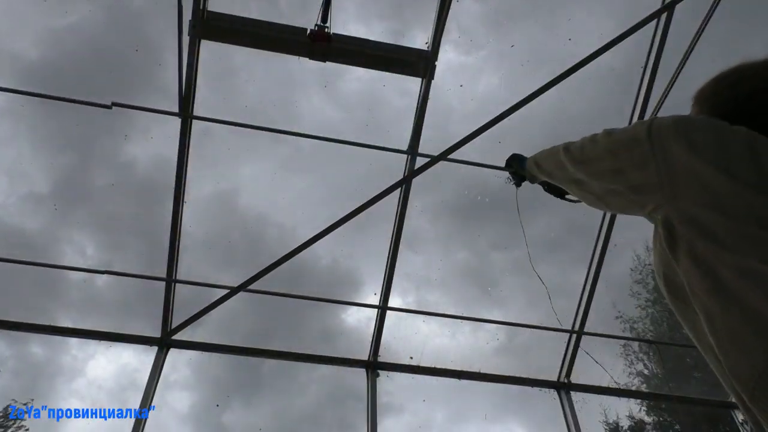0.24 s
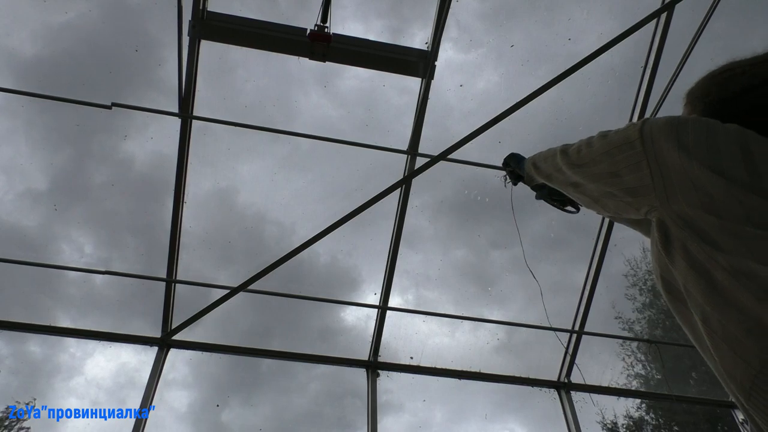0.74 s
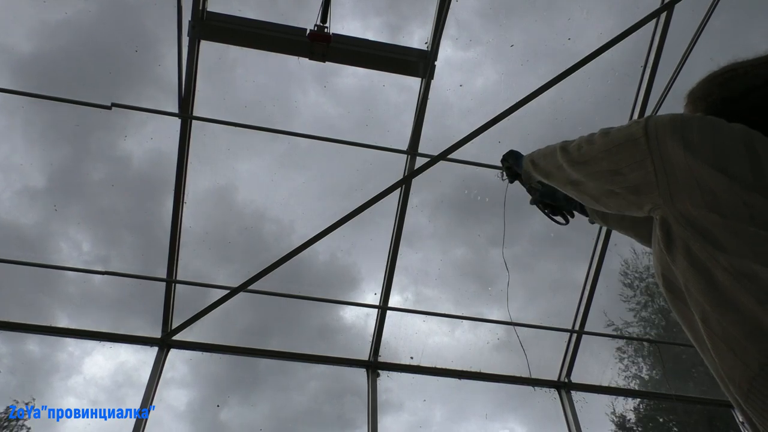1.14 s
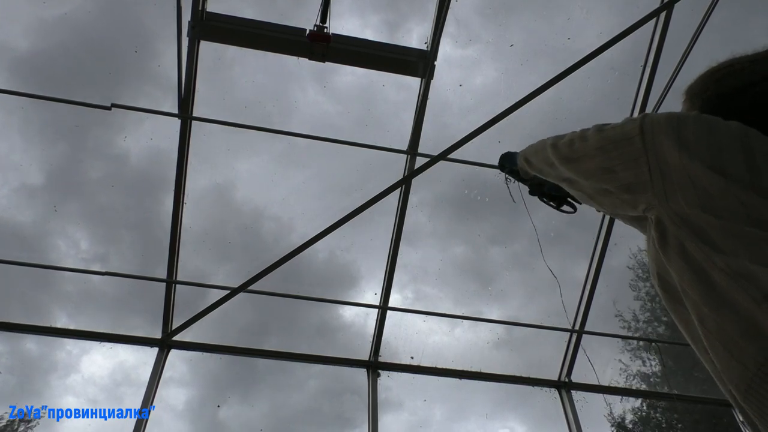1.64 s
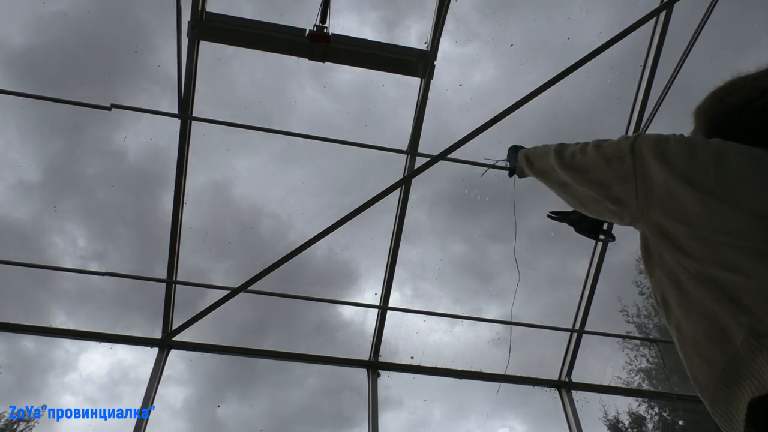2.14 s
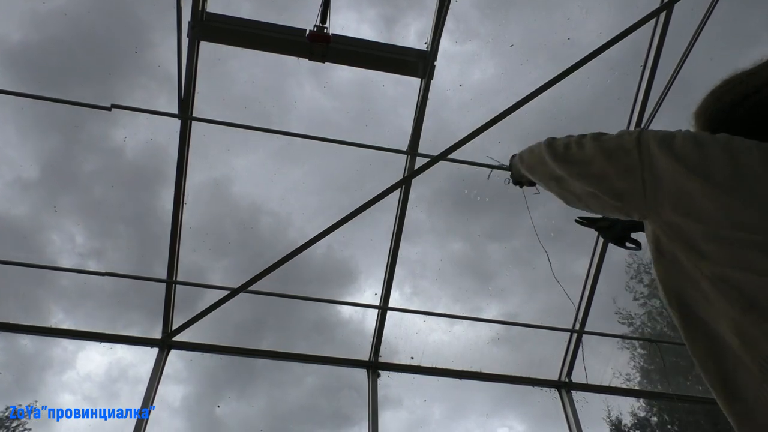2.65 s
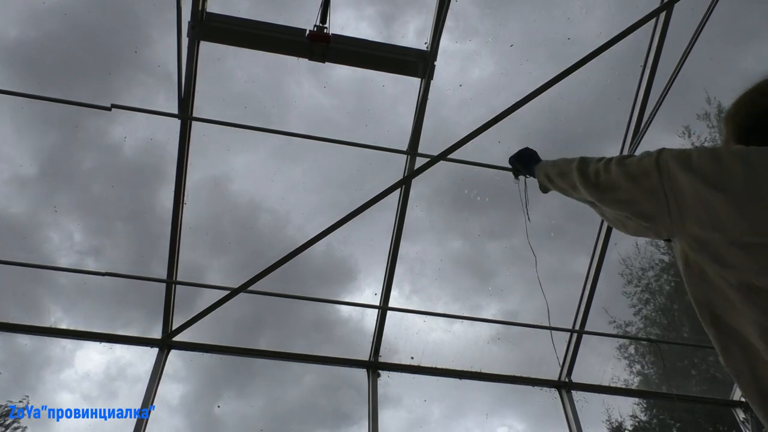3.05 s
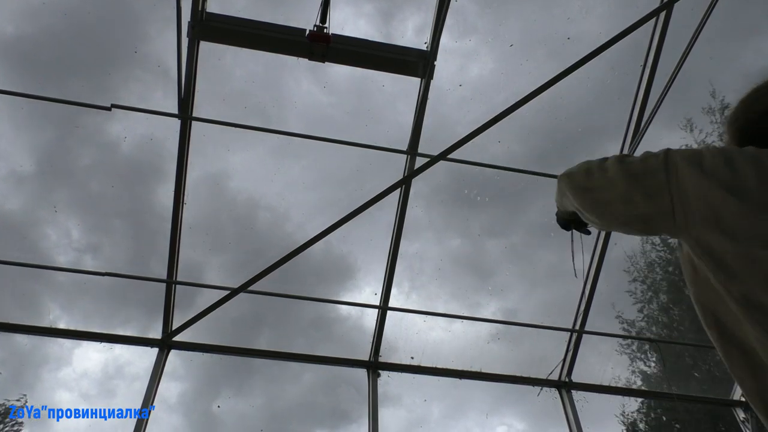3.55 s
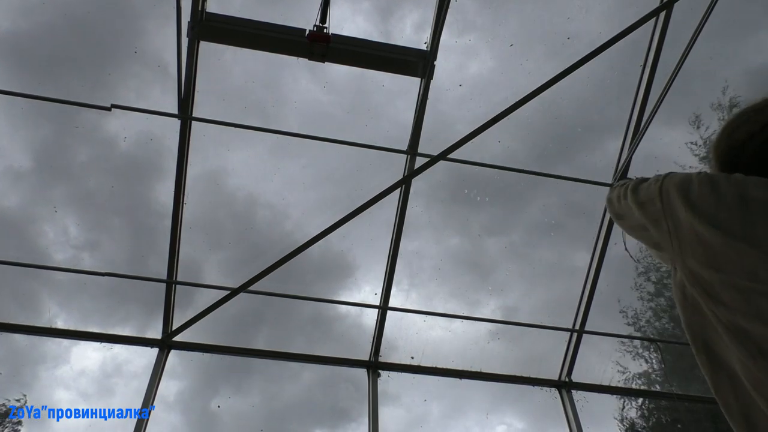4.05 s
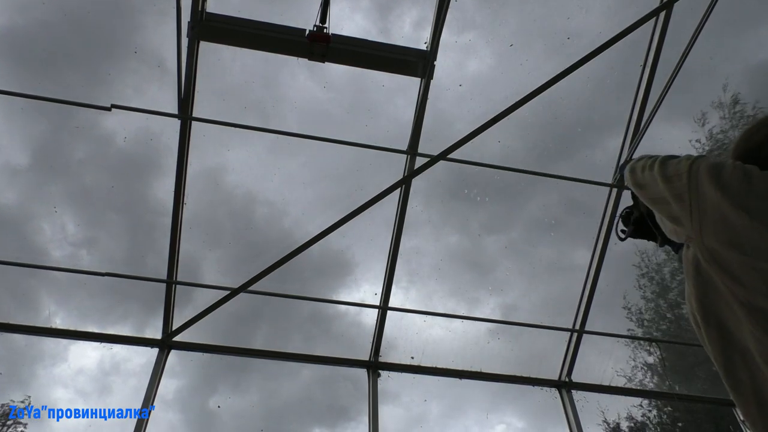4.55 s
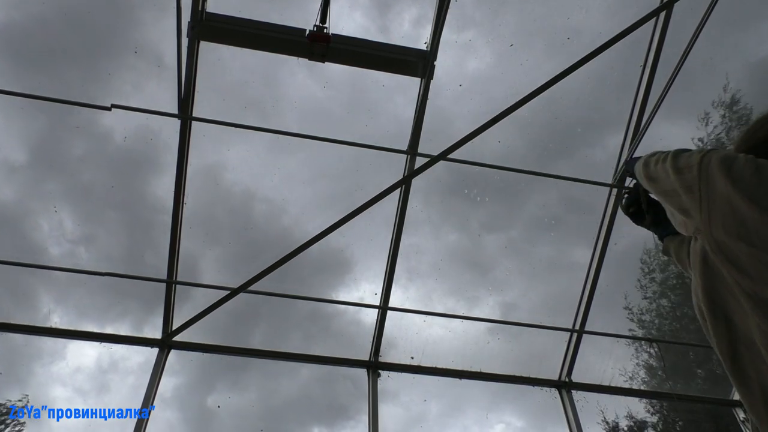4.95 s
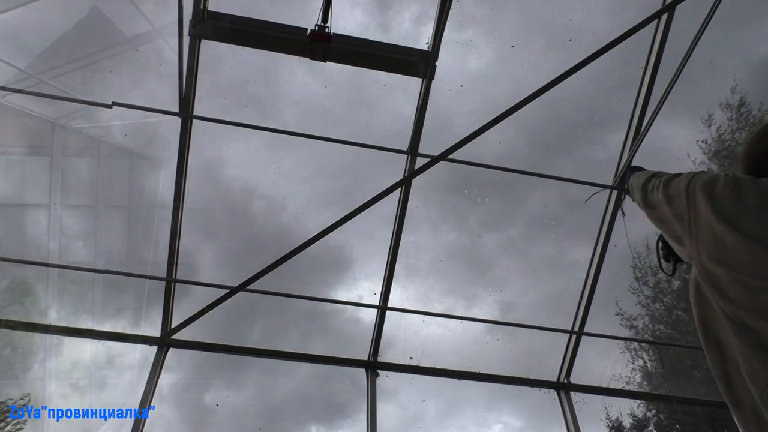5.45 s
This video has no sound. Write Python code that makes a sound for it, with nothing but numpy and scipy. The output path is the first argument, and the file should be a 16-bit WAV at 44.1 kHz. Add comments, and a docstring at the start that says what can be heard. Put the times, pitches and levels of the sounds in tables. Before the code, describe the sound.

Irregular crisp secateur clicks and light scrapes on twine and wire ring shortly off greenhouse panels, over very faint air and sleeve rustle.

```python
"""A small greenhouse: pruning shears cut twine off the roof wires, a few metres above two microphones.
Snips, scrapes and taps are short noise excitations that ring damped modes of the steel and frame;
the hard panels answer with dense decaying echoes. Sines give sharp ticks, twine crackle and damped tones.
Faint outdoor air and the rustle of hands and sleeves, made of filtered noise, fill the gaps."""
import sys
import numpy as np
from scipy import signal
from scipy.fft import rfft, irfft, next_fast_len
from scipy.io import wavfile
from scipy.ndimage import uniform_filter1d, map_coordinates

SR = 44100
rng = np.random.default_rng(int(sys.argv[2]) if len(sys.argv) > 2 else 0)


def nominal_scale(level):
    """Amplitude ratio for a level in decibels (scalar or array-like)."""
    x = np.asarray(level, float) / 20
    return 10 ** x


def transcribe(signal):
    """Save signal, clipped to [-1, 1], as a 16-bit WAV file at the path in sys.argv[1]."""
    frames = np.atleast_2d(signal).T
    limited = np.clip(frames, -1, 1)
    pcm = np.round(limited * 32767).astype(np.int16)
    wavfile.write(sys.argv[1], SR, pcm)


N = 251634

# sharp contacts, blade on blade or a parting fibre: (t/s, steel level/dB, brightness/dB,
# frame jolt level/dB, tick starting level before its high-pass/dB)
SNAPS = [(0.364, -57.5, 0.5, -71, -32), (0.5411, -35, 0, -67, -21), (0.644, -35.5, 3, -60.5, -21),
         (0.782, -54, 6.5, -69, -50), (0.889, -59.5, -3, -73, -55), (0.985, -43.5, 1.5, -66, -42),
         (1.1209, -34, -0.5, -48, -30), (1.2194, -53.5, 5.5, -55.5, -39), (1.355, -48, 0, -70, -37),
         (1.67, -50, 0.5, -53.5, -53), (1.751, -37.5, 4.5, -44.5, -17), (1.765, -35.5, -4, -56, -25),
         (1.812, -47.5, -4, -49.5, -33), (2.504, -57.5, -5, -62, -47), (3.248, -48.5, -9, -65, -48),
         (3.298, -38, 1, -51, -34), (3.8389, -35.5, -2, -53, -27), (4.638, -53.5, 0, -73, -43),
         (4.657, -46.5, -2, -54, -46), (4.802, -65.5, -12, -74, -56), (5.1398, -34, -1, -47, -16),
         (5.266, -54.5, 5.5, -61.5, -30), (5.645, -62, -7, -82, -54), (5.689, -55.5, 4, -73, -50)]
# drawn-out contacts, blades and fingers sliding on twine and wire:
# (t/s, steel level/dB, brightness/dB, frame jolt level/dB)
SCRAPES = [(0.31, -64.5, 2, -71), (0.39, -51.5, 1.5, -69), (0.403, -52, 3.5, -64.5), (0.493, -63, 7, -80),
           (0.589, -50.5, 3, -65), (0.76, -67, -16, -69), (0.962, -54.5, 4, -70), (1.015, -58, 2, -81),
           (1.105, -57, -10.5, -57), (1.39, -54, -4, -75), (1.425, -54, -3, -78), (1.455, -58, -1, -62.5),
           (1.682, -46, -4, -53.5), (1.733, -46.5, -8, -59), (1.791, -45.5, -8.5, -58.5),
           (1.835, -55, 2, -67), (1.859, -57.5, -1, -56.5), (1.96, -70, 7, -58), (2.13, -74, -5, -58.5),
           (2.51, -61, -6, -67), (2.545, -71, -6, -69), (2.734, -62, -1, -90), (2.852, -61.5, -2, -76),
           (2.93, -58.5, 2, -79), (3.287, -42, -4, -55), (3.31, -50, -9.5, -54.5), (3.392, -47, -2.5, -57),
           (3.412, -47.5, -8, -55), (3.56, -66, 8, -70), (3.77, -60, 0, -64), (4.109, -68, 2, -60),
           (4.553, -62, -5, -78), (4.871, -63, 0, -68), (5.03, -66, 11.5, -76), (5.295, -65, 8, -63),
           (5.621, -63, 2, -84)]


def unit(x):
    """Normalisation: the signal scaled to rms 1."""
    return x / np.sqrt(np.mean(x ** 2) + 1e-20)


def along(points, hz):
    """Logarithmic frequency scale: (f/Hz, value) points joined by straight lines on it."""
    f, value = np.transpose(points)
    return np.interp(np.log(hz + 1), np.log(f + 1), value)


def filtered(x, response):
    """Linear filtering: the spectrum of x multiplied by a response of frequency."""
    size = next_fast_len(x.shape[-1] + 4096)
    spectrum = rfft(x, size) * response(np.fft.rfftfreq(size, 1 / SR))
    return irfft(spectrum, size)[..., :x.shape[-1]]


def split(x, borders_hz, colour=((1, 0),)):
    """Complementary filters: x, coloured in dB, cut into neighbouring bands that add up."""
    edges = np.reshape([1e-9, *borders_hz, 1e9], (-1, 1, 1))

    def response(hz):
        lowpasses = 1 / (1 + (hz / edges) ** 8)
        return nominal_scale(along(colour, hz)) * np.diff(lowpasses, axis=0)

    return filtered(x, response)


def spread(pair, alike):
    """Interchannel coherence: two unrelated signals, as mid and side, give the wanted left-right likeness."""
    def response(hz):
        angle = np.arccos(np.clip(along(alike, hz), -1, 1)) / 2
        return np.array([np.cos(angle), np.sin(angle)])

    mid, side = filtered(pair, response)
    return np.array([mid + side, mid - side])


def background():
    """Filtered noise: outdoor air through the panels, patchy with the rustle of cloth and twine."""
    # rustle of hands and sleeves: (t/s, rms level/dB)
    rustle = [(0.0, -61), (0.35, -59.5), (0.57, -62), (0.71, -56.5), (1.35, -59), (1.48, -60), (3.22, -61),
              (3.43, -59), (4.52, -62), (4.79, -60), (5.48, -62.5), (5.7, -61.5)]
    # colour within each band of the air as heard, with a dip at 1.2-1.6 kHz that everything shares: (f/Hz,
    # relative level per Hz/dB)
    air_colour = [(15, -49), (25, -25), (70, -2.5), (130, -10), (212, 1), (466, -7), (663, -2), (893, -6.5),
                  (1200, -16), (1380, -13.5), (1620, -16), (2430, -7), (5790, -10), (14900, -11),
                  (16200, -31)]
    # likeness of left and right as heard in the finished sound, nearly mono at the very top: (f/Hz, likeness)
    air_alike = [(60, 0.49), (130, 0.89), (290, 0.73), (640, 0.64), (1410, 0.82), (3100, 0.76),
                 (6820, 0.52), (15000, 0.93)]
    low_air_db, drift_db, hiss_db = -67.5, 0.54, -65
    at, rustle_db = np.transpose(rustle)
    rustle_db = np.interp(np.arange(N) / SR, at, rustle_db)
    drift = map_coordinates(rng.standard_normal(30), [4 * np.arange(N) / SR])  # 4 knots a second
    hiss_level = hiss_db + rustle_db - rustle_db.mean()  # the hiss follows the rustle
    levels = low_air_db + drift_db * drift, rustle_db, hiss_level

    z = signal.stft(rng.standard_normal((2, N)), nperseg=512)[2]
    patches = rng.standard_normal(z.shape[1:])
    patches = uniform_filter1d(patches, size=7, axis=0)  # over frequency
    patches = uniform_filter1d(patches, size=8, axis=1)  # over time
    pair = signal.istft(z * nominal_scale(1.2 * unit(patches)), nperseg=512)[1][:, :N]
    air = filtered(spread(pair, air_alike), lambda hz: nominal_scale(along(air_colour, hz)))
    bands = split(air, [1300, 7500])  # low air, rustle, hiss
    return sum(nominal_scale(db) * unit(band) for db, band in zip(levels, bands))


def pings():
    """Free vibration: single damped tones, many rung by a snap, waver as the echoes interfere."""
    # single tones of spring, wires and panels, many starting with a snap:
    # (t/s, f/Hz, level before rise, decay and wavering/dB)
    single_tones = [(0.199, 311, -49), (.327, 4750, -52), (.546, 4720, -36), (0.647, 2530, -36),
                    (.78, 6800, -63), (0.843, 1223, -49), (.968, 2700, -46), (1.13, 82.6, -60),
                    (1.14, 606, -43), (1.16, 3600, -37), (1.311, 2710, -49), (1.359, 5830, -44),
                    (1.45, 6885, -46.5), (1.81, 597, -36.5), (1.905, 6900, -51), (2.51, 4360, -51),
                    (3.4, 5850, -37.5), (3.846, 410.5, -40), (4.66, 618, -45), (5.045, 9330, -55),
                    (5.142, 2600, -35), (5.146, 630, -41), (5.15, 87.3, -54), (5.2, 174, -50.5),
                    (5.645, 2290, -50), (5.647, 6690, -49), (5.69, 2780, -42.5), (5.691, 5850, -51)]
    # panel modes that a sharp jolt sets humming: (f/Hz, level over the jolt/dB, rise constant/s, t60/s)
    panel_modes = [(284, 5, .007, 0.18), (623, -8.5, 0.0077, 0.27), (1004, -4, .005, 0.25)]
    rise_cycles = 9.1
    t60_at_1khz_s, longer_power = 0.19, 0.38  # lower tones last longer
    out, t = np.zeros((2, N + SR)), np.arange(SR) / SR
    tones = []
    for at, hz, db in single_tones:
        t60 = t60_at_1khz_s * (1000 / hz) ** longer_power
        tones.append((at, hz, db, rise_cycles / hz, t60))
    for at, _, _, jolt_db, _ in SNAPS:
        for hz, over_db, rise, t60 in panel_modes:
            tones.append((at, hz, jolt_db + over_db, rise, t60))

    for at, hz, db, rise, t60 in tones:
        knots = rng.standard_normal((3, 70))  # 60 a second
        left, right, swell = (map_coordinates(row, [60 * t]) for row in knots)
        shape = nominal_scale(db + 3 * swell - 60 * t / t60) * (1 - np.exp(-t / rise))
        phase = 2 * np.pi * hz * t + .5 * np.array([left, right])
        out[:, round(at * SR):][:, :SR] += shape * np.sin(phase)
    return out[:, :N]


def band_levels(steel_db, bright_db, jolt_db):
    """Spectral balance: levels of boom, knock, clack, snap and sizzle of one contact in dB."""
    # clack and sizzle relative to the snap at brightness 0: (level/dB)
    edge_db = [-5.5, -3.5]
    knock_share, knock_db = 0.48, -2.5
    clack = steel_db + edge_db[0] - bright_db  # brightness moves level from clack to sizzle
    sizzle = steel_db + edge_db[1] + bright_db
    knock = knock_share * jolt_db + (1 - knock_share) * clack + knock_db
    return [jolt_db, knock, clack, steel_db, sizzle]


def ring(modes, t, scatter_db, detune):
    """Modal superposition: damped modes, each time at new strengths and phases and slightly off pitch."""
    hz, db, t60 = np.transpose(modes)[..., None]
    luck, shift = rng.standard_normal((2, *hz.shape))
    phase = 2 * np.pi * (hz * (1 + detune * shift) * t + rng.random(hz.shape))
    return (nominal_scale(db + scatter_db * luck - 60 * t / t60) * np.sin(phase)).sum(0)


def echoes(t, build_s=0.00073, hold_s=0.009, early_t60=0.23, late_db=6.0):
    """Reverberation: panel echoes build fast, hold, then decay at an early rate plus one set by frequency."""
    # late decay of the whole house: (f/Hz, t60/s)
    house_decay = [(150, 1), (400, 0.69), (1040, 0.32), (2760, 0.31), (7280, 0.13), (15000, 0.06)]
    # likeness of left and right as heard in the finished sound, mono at the very top: (f/Hz, likeness)
    echo_alike = [(60, 0.58), (130, 0.87), (290, 0.93), (640, 0.97), (1410, 0.68), (3100, 0.63),
                  (6820, 0.7), (15000, 1)]
    walls = rng.standard_normal((2, len(t)))
    # early echoes are sparse and uneven
    walls = walls * nominal_scale(5 * np.exp(-t / .04) * rng.standard_normal(len(t)))
    hz, at, z = signal.stft(walls, SR, nperseg=256)
    since = np.clip(at - hold_s, 0, None)
    early = nominal_scale(-60 * since / early_t60)
    late = nominal_scale(late_db - 60 * since / along(house_decay, hz)[:, None])
    tail = signal.istft(z * (early + late), SR, nperseg=256)[1][:, :len(t)]
    tail = tail * (1 - np.exp(-t / build_s))
    tail[0, 0] = 20.0  # the direct sound, in the middle
    return spread(tail, echo_alike)


def contacts(table, length, steel_db):
    """Source-filter chain: noise that swells and fades rings the steel, then the frame and echoes."""
    # blades, pivot and spring: (f/Hz, relative level/dB, t60/s)
    steel_modes = [(2290, -17, 0.074), (2708, -10.5, 0.14), (3099, 3.5, 0.029), (3600, -2, 0.061),
                   (4010, -5, 0.03), (4230, -1, 0.049), (4678, -1.5, 0.041), (5280, -22, .045),
                   (5807, 5.5, 0.036), (6450, -6, .045), (6885, 2, 0.041), (7500, 2.5, 0.016),
                   (8600, -13, 0.036), (10400, 1, 0.034)]
    # roof frame and panels: (f/Hz, relative level/dB, t60/s)
    frame_modes = [(203, -3, 1.2), (287, -2, .9), (312, -5, .6), (432, -11, .45), (608, -5, .25),
                   (716, -9, .2), (870, -11, .2), (1010, -14, .2)]
    # colour within each band of a contact as heard, with a dip at 1.2-1.6 kHz that everything shares: (f/Hz,
    # relative level per Hz/dB)
    snip_colour = [(59, -40), (100, -23.5), (278, -5), (425, -7.5), (840, -3.5), (1210, -13), (1590, -11),
                   (2770, 3), (3420, -3.5), (4240, -1), (4710, -4), (6630, -4.5), (10600, -14),
                   (15200, -15.5), (16200, -51)]
    # borders between boom, knock, clack, snap and sizzle: (f/Hz)
    band_borders = [450, 1500, 4000, 8500]
    # swell of each band, as frame and panels get moving slowly in the low ones: (time constant/s)
    swell_s = [0.004, 0.0062, 0.00038, 0.00056, .0003]
    out, t = np.zeros((2, N + SR)), np.arange(SR * 3 // 4) / SR
    brief = t[:SR // 10]
    u = brief / length
    for at, band_db in table:
        noise = u * np.exp(-u) * rng.standard_normal(len(u)) * nominal_scale(9 * rng.standard_normal(len(u)))
        spectrum = rfft(noise, 2 * len(u))
        noise = irfft(spectrum / abs(spectrum))[:len(u)]  # flattened, so that the burst favours no pitch

        steel = np.append(1, nominal_scale(steel_db) * ring(steel_modes, brief, scatter_db=3, detune=.006))
        frame = ring(frame_modes, t, scatter_db=4.5, detune=0.0303)
        frame = nominal_scale(-11.0) * (1 - np.exp(-t / 0.0059)) * frame
        answer = echoes(t) + frame
        struck = signal.fftconvolve(noise, steel)
        sound = signal.fftconvolve(struck[None], answer, axes=1)[:, :len(t)]

        bands = split(sound, band_borders, snip_colour)
        bands = bands * (1 - np.exp(-t / np.reshape(swell_s, (-1, 1, 1))))
        # levels hold for each band's loudest 12 ms
        power = (bands[..., :len(u)] ** 2).mean(1)
        top = uniform_filter1d(power, 530).max(1) ** .5
        out[:, round(at * SR):][:, :len(t)] += np.tensordot(nominal_scale(np.array(band_db)) / top, bands, 1)
    return out[:, :N]


def crackle(count=8):
    """Brittle fracture: fibres of dry twine tick a few times in every scrape, as short decaying sines."""
    spread_s, over_db, centre_hz = .06, 4, 6200
    at, steel_db = np.transpose(SCRAPES)[:2, :, None]
    when, size, pitch = np.moveaxis(rng.random((len(at), 3, count)), 1, 0)
    t = np.arange(64) / SR
    start = nominal_scale(steel_db + over_db - 8 * when + 9 * size).ravel()  # later ticks tend to be weaker
    hz = centre_hz * 2 ** (1.6 * (pitch.reshape(-1, 1) - .5))
    grains = start[:, None] * nominal_scale(-8 * t * hz) * np.sin(2 * np.pi * hz * t)  # 8 dB lost per cycle
    place = ((at + spread_s * when) * SR).astype(int).reshape(-1, 1) + np.arange(64)
    dry_ticks = np.bincount(place.ravel(), grains.ravel(), N + SR)[:N]
    return signal.sosfilt(signal.butter(3, 1500, "high", fs=SR, output="sos"), dry_ticks)


def ticks():
    """Direct sound: a tick of a few fast-dying cycles of steel without bass, alike in both microphones."""
    tick_hz, octaves_per_db, lag_s = 4600, 0.85, 0.00091  # a brighter contact ticks higher
    out, t = np.zeros(N + SR), np.arange(SR // 100) / SR
    for at, _, bright_db, _, db in SNAPS:
        hz = np.clip(tick_hz * 2 ** (octaves_per_db * bright_db), 2300, 7400)
        fade = nominal_scale(db - 60 * t * hz / 6.6)  # 60 dB lost in 6.6 cycles
        out[round((at + lag_s) * SR):][:len(t)] += fade * np.sin(2 * np.pi * hz * t)
    return signal.sosfilt(signal.butter(3, 1500, "high", fs=SR, output="sos"), out[:N])


def scene():
    """Linear superposition: air, pings, shears, crackle and ticks add up."""
    # handle against wire: (t/s, level/dB that the shape below offsets)
    knocks = [(0.5412, -52), (0.644, -50.5), (0.76, -60), (0.843, -50.5), (3.249, -58), (3.8388, -41.5),
              (4.657, -47), (5.645, -63.5), (5.69, -61)]
    # boom, knock, clack, snap and sizzle of a hollow knock: (relative level/dB)
    knock_shape = [-17.5, -2, -3, -30, -40]
    scrapes = [(at, band_levels(*row)) for at, *row in SCRAPES]
    sharp = [(at, band_levels(*row[:3])) for at, *row in SNAPS]
    sharp += [(at, db + np.array(knock_shape)) for at, db in knocks]
    shears = contacts(scrapes, length=.006, steel_db=-41) + contacts(sharp, length=.0005, steel_db=-41)
    return background() + pings() + shears + crackle() + ticks()


def band_limit(x):
    """A steep low-pass at the top of the band."""
    return signal.sosfilt(signal.butter(12, 16960, fs=SR, output="sos"), x)


def record(dry):
    """Linear filtering: the two microphones differ a little in colour; a low-pass then removes the top."""
    # colour difference of the microphones: (f/Hz, left over right level/dB)
    lean = [(60, -1), (150, -1), (380, -0.5), (950, -1), (2380, -0.5), (5980, -0.5), (15000, -1)]
    lowpass_hz = 16700

    def response(hz):
        halves = np.array([[.5], [-.5]])  # half of the difference to each side
        return nominal_scale(along(lean, hz) * halves) * (hz < lowpass_hz)

    return band_limit(filtered(dry, response))


dry = scene()
out = record(dry)
transcribe(out)
```